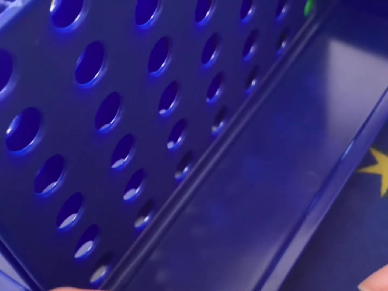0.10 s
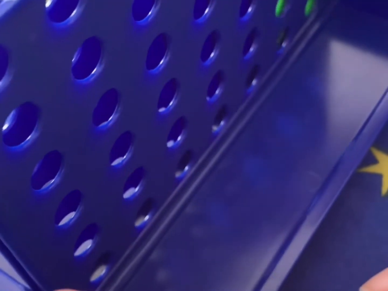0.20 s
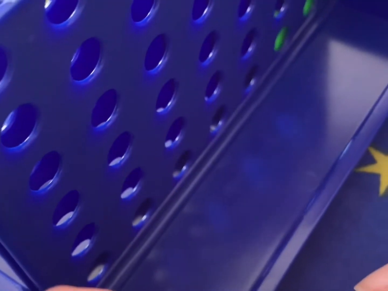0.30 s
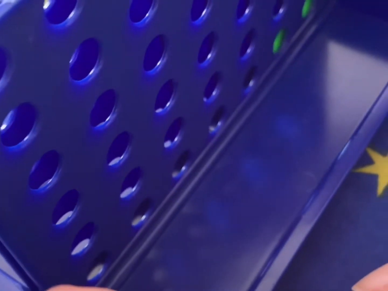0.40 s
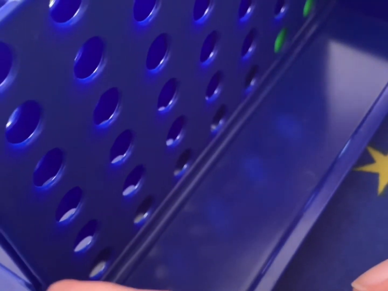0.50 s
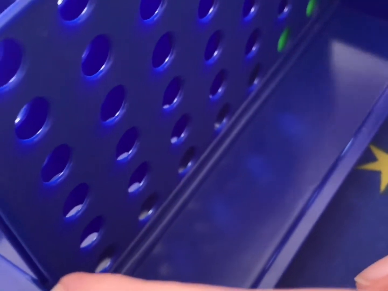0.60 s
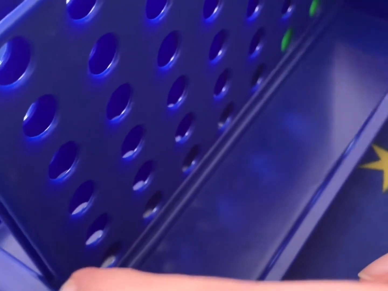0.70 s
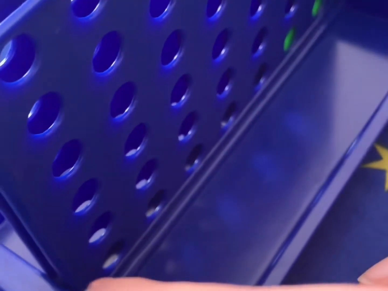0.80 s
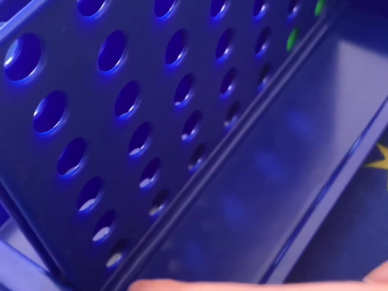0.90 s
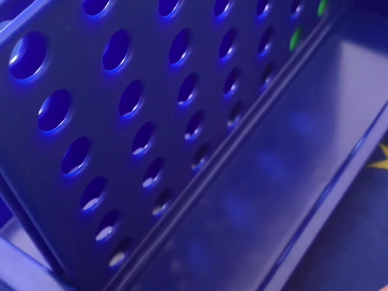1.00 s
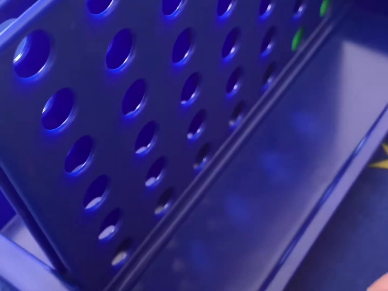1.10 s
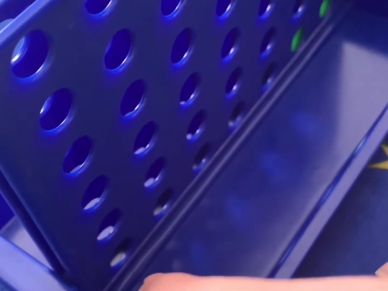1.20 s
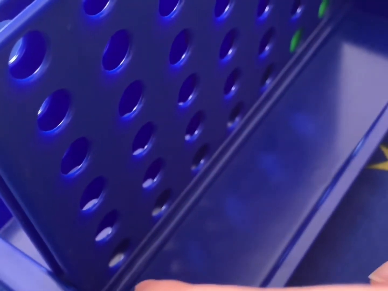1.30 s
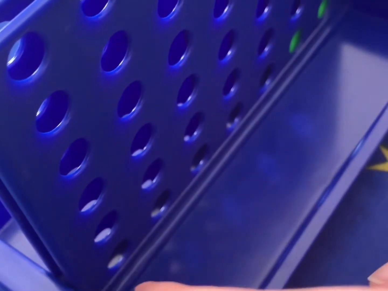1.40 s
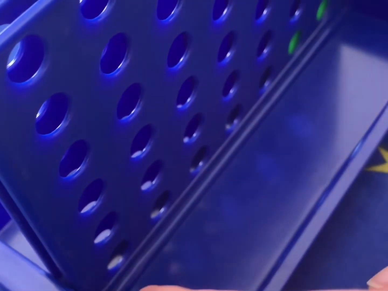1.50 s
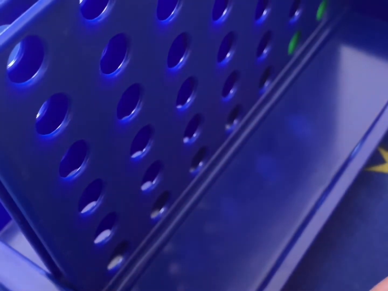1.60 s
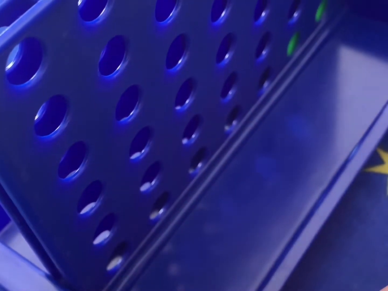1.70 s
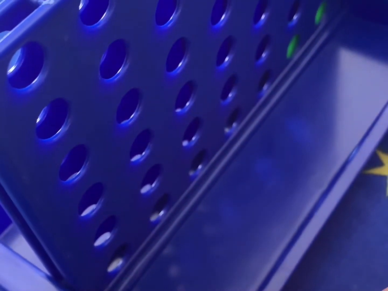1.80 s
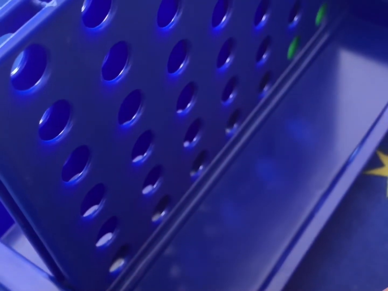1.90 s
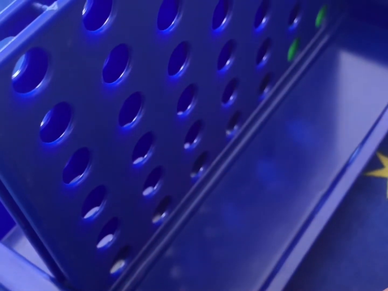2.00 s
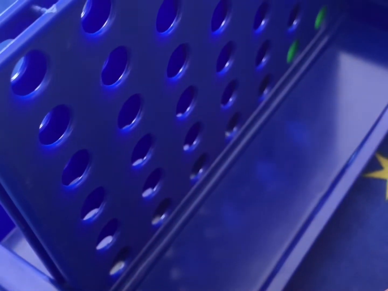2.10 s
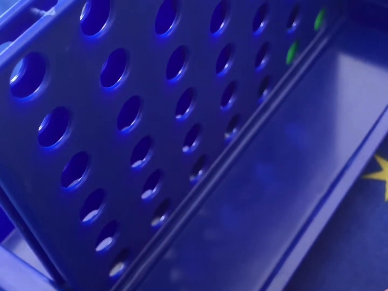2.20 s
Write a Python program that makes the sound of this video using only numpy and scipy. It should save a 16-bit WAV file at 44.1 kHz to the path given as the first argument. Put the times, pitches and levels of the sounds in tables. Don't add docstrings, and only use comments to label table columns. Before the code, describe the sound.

A plastic disc drops into an upright plastic grid: light edge taps from 0.1 s, a sharp knock and scraping rattle at 0.23, a loud landing clack at 0.31 and bounce at 0.34. A small click at 0.52, then handled discs tick and ring high at 0.94-1.1 with soft thumps. Faint ticks near 1.47, a tiny squeak at 1.85, light clicks at 2.1-2.19. Close, dry, quiet room with low rumble.

```python
import sys
import numpy as np
from scipy import signal
from scipy.fft import rfft, irfft, next_fast_len
from scipy.io import wavfile
from scipy.ndimage import map_coordinates

SR = 44100
rng = np.random.default_rng(int(sys.argv[2]) if len(sys.argv) > 2 else 0)


def natural_amplitude(level_db):
    exponent = np.asarray(level_db, float) / 20
    return 10 ** exponent


def wav_record(signal):
    frames = np.transpose(np.atleast_2d(signal))
    bounded = np.clip(frames, -1, 1)
    quanta = np.round(bounded * 32767).astype(np.int16)
    wavfile.write(sys.argv[1], SR, quanta)


N = 97020

# centre_hz, width_hz, level_db
SLOT_MODES = [(1686, 260, -17.5), (2640, 310, -20.5), (3610, 300, -2), (4815, 2000, -13), (6920, 470, 1.5),
              (8650, 740, -3), (11402, 3000, -18), (15000, 1700, -23)]
# centre_hz, width_hz, level_db
LOOSE_GRID_MODES = [(1702, 69, 1), (2030, 350, -6.5), (2457, 110, -1.5), (2934, 110, 2.5), (3424, 90, 5),
                    (3565, 90, 5.5)]
# centre_hz, width_hz, level_db
GRID_TREBLE_MODES = [(4340, 500, -3.5), (6053, 260, 3.5), (7200, 180, -1), (8310, 870, 0.5),
                     (10460, 420, -4), (12230, 1500, -6.5), (14540, 500, -8), (15700, 800, -14)]
SCATTER_DB = 1.5


def unit(x):
    return x / np.sqrt(np.mean(x ** 2) + 1e-20)


def along(points, hz):
    f, v = np.transpose(points)
    return np.interp(np.log(hz + 1), np.log(f + 1), v)


def curve(rows):
    return np.interp(np.arange(N) / SR, *np.transpose(rows))


def wobble(rate):
    knots = rng.standard_normal(int(N * rate / SR) + 4)
    return map_coordinates(knots, [np.arange(N) * rate / SR])


def filtered(x, response):
    m = next_fast_len(x.shape[-1] + 8192)
    return irfft(rfft(x, m) * response(np.fft.rfftfreq(m, 1 / SR)), m)[..., :x.shape[-1]]


def body(modes, hz, extra_db=0):
    centre, width, db = np.transpose(modes)[:, :, None]
    sign = (-1.) ** np.arange(len(modes))[:, None]
    damping = 1j * hz * width
    return (sign * natural_amplitude(db + extra_db) * damping / (centre * centre - hz * hz + damping)).sum(axis=0)


def noise(spectrum):
    return unit(filtered(rng.standard_normal((2, N)), lambda hz: natural_amplitude(along(spectrum, hz))))


def contacts(rows, modes_of, snap, scatter_db, contact=1, rise=0.00036):
    out, t = np.zeros(N + 4096), np.arange(4096) / SR
    for start_s, db, t60, colour in rows:
        force = rng.standard_normal(len(t)) * natural_amplitude(-60 * t / t60) * (1 - np.exp(-t / rise))
        force[8:8 + contact] += snap
        modes = np.array(modes_of(colour))
        scatter = scatter_db * rng.standard_normal((len(modes), 1))
        ring = filtered(force, lambda hz: body(modes, hz, scatter))
        out[round(start_s * SR):][:len(t)] += natural_amplitude(db) * ring / np.abs(ring).max()
    return out[:N]


def tilted(modes):
    return lambda tilt_db: [(c, w, db + tilt_db * np.log2(c / 4000)) for c, w, db in modes]


def lifted(modes, gain_db):
    return [(c, w, db + gain_db) for c, w, db in modes]


def room_tone():
    # frequency_hz, level_db
    room_spectrum = [(60, -4), (95, 3), (140, -18), (190, -7.5), (330, -21), (600, -27), (1100, -23),
                     (2000, -38.5), (4500, -56), (14500, -60.5), (15200, -85)]
    shared, opposed = noise(room_spectrum) * natural_amplitude(0.47 * wobble(7))
    opposed = filtered(opposed, lambda hz: .55 * hz / (hz + 300) / (1 + (hz / 3000) ** 2))
    return natural_amplitude(-57) * (ports(shared) + np.array([opposed, -opposed]))


def handling():
    # start_s, level_db, pitch_hz
    thumps = [
        (.002, -33, 64.4),
        (0.437, -34, 61.4),
        (.58, -35, 25),
        (0.954, -25.5, 85.2),
        (1.1, -31.5, 109.2),
        (2.101, -37, 191),
    ]
    # time_s, level_db
    rumble_level = [(0, -45.5), (.1, -54.5), (.4, -58), (.6, -47.5), (.75, -55.5), (1.1, -48), (1.4, -57),
                    (2.2, -61)]
    # frequency_hz, level_db
    rumble_spectrum = [(8, -11.5), (25, 5.5), (60, -7.5), (120, -14), (300, -14.5), (500, -49), (900, -120)]
    out, t = np.zeros(N + 4096), np.arange(4096) / SR
    for start_s, db, hz in thumps:
        swing = np.sin(2 * np.pi * hz * t) * np.exp(-hz * t / 0.71)
        onset = np.tanh(hz * t * 2) ** 2
        out[round(start_s * SR):][:len(t)] += natural_amplitude(db) * swing * onset
    lumps = unit(natural_amplitude(3 * wobble(42)))
    return out[:N] + noise(rumble_spectrum)[0] * lumps * natural_amplitude(curve(rumble_level) - 3.5)


def rustle():
    # frequency_hz, level_db
    cloth_spectrum = [(1500, -28), (3200, -4), (4500, -3.5), (6000, -0.5), (9000, -7.5), (14200, -4.5),
                      (14800, -36.5)]
    # time_s, level_db
    rustle_level = [(0, -84), (.07, -74.5), (.6, -79), (.7, -69.5), (.8, -75), (.9, -87), (.95, -64.5),
                    (1.02, -59), (1.035, -70), (1.05, -63.5), (1.12, -79), (1.23, -83), (1.29, -75),
                    (1.33, -83), (1.37, -70), (1.5, -87), (2.06, -84.5), (2.15, -67.5)]
    grain = unit(natural_amplitude(2.1 * wobble(250) + 3.0 * wobble(42)))
    return noise(cloth_spectrum)[0] * grain * natural_amplitude(curve(rustle_level) + 1.5)


def column_knocks():
    # start_s, peak_db, chatter_t60_s, brightness_db_per_octave
    knocks = [(.001, -44.5, 0.14, -3.5), (.2341, -4, .009, 0.5), (.236, -9, .008, 2.5),
              (.2475, -19.5, .02, -6.5), (.2491, -17, .016, -2), (.2547, -16.5, .024, -3.5),
              (.2629, -21, .02, 2.5), (.2659, -23, .024, 2.5), (.2732, -21.5, .02, 2),
              (.2796, -28, .024, 1), (.2865, -26.5, .03, 3), (.2938, -29, .04, 2),
              (.4758, -40.5, .03, -0.5), (.478, -38, .04, 1.5), (.4815, -41, .06, -2.5)]
    # centre_hz, width_hz, level_db
    open_column = [(456, 45, 0), (935, 60, -4.5), (1250, 300, -11)]
    modes = tilted(open_column + LOOSE_GRID_MODES + GRID_TREBLE_MODES)
    return contacts(knocks, modes, 5, SCATTER_DB, 2)


def scrape():
    # time_s, level_db
    slide_level = [(.08, -59.5), (.1, -61), (.21, -57), (.2285, -27), (.233, -19.5), (.2365, -40.5),
                   (.252, -31.5), (.3, -44), (.325, -53.5), (.384, -45), (.392, -65), (.45, -113.5)]
    grit = rng.standard_normal(N) * natural_amplitude(2.7 * wobble(500) + 2.0 * wobble(79))

    def plastic(hz):
        grid = body(LOOSE_GRID_MODES + GRID_TREBLE_MODES, hz)
        return (grid + 1.9 * body(SLOT_MODES, hz)) / (1 + 1j * hz / 9000)

    sliding = np.arange(N) / SR > slide_level[0][0]
    return unit(filtered(grit, plastic)) * natural_amplitude(curve(slide_level)) * sliding


def slot_taps():
    # start_s, peak_db, chatter_t60_s, brightness_db_per_octave
    taps = [
        (.099, -34.5, 0.066, -4.5),
        (.1068, -19.5, 0.03, -1),
        (.1188, -25, 0.03, 1),
        (.1592, -22, 0.0093, 2.5),
        (.1832, -24, 0.014, 8.5),
        (.1955, -41.5, 0.015, 3),
        (.2135, -34, 0.025, 2),
        (.2168, -22, 0.017, 2),
        (.2212, -24, 0.016, -1.5),
        (.225, -25.5, .016, -6.5),
    ]
    return contacts(taps, tilted(SLOT_MODES), 1.1, SCATTER_DB, rise=.001)


def landing_clacks():
    # start_s, peak_db, chatter_t60_s, brightness_db_per_octave
    clacks = [
        (.3104, -24, .01, -2),
        (.3123, -1, 0.018, 0.5),
        (.3152, -11, .012, -1),
        (.3238, -21.5, 0.015, -4),
        (.344, -3.5, 0.03, -0.5),
        (.3557, -24.5, 0.014, -1.5),
        (.3598, -13, 0.014, -2),
        (.3692, -25, 0.016, -3.5),
        (.3744, -24.5, .016, -3.5),
        (.379, -32, 0.012, -5),
    ]
    # centre_hz, width_hz, level_db
    filled_column = [(540, 50, -7.5), (800, 410, -19.5), (1092, 65, -10)]
    # centre_hz, width_hz, level_db
    loaded_grid = [(1420, 150, -24), (1760, 85, -2), (1888, 85, 0), (2200, 300, -12), (2448, 90, -5),
                   (2610, 85, 1), (2948, 100, 0), (3420, 90, -2), (3797, 85, 4)]
    modes = tilted(filled_column + loaded_grid + GRID_TREBLE_MODES)
    return contacts(clacks, modes, 7, SCATTER_DB, 3)


def loose_discs():
    # start_s, peak_db, ring_db, body_db, chatter_t60_s
    ticks = [(0.5162, -22.5, 2.5, -4, 0.014), (0.5176, -29.5, 11, -8, .014),
             (0.5224, -35.5, -0.5, -2.5, 0.0157), (0.773, -51.5, -10, -0.5, 0.0095),
             (.858, -45, -9.5, -5, 0.012), (.861, -45, -18.5, -0.5, 0.013), (0.9401, -27, 5, -2, 0.02),
             (0.9431, -20.5, -12, -5, 0.0082), (0.9477, -25.5, -15, 1, 0.0096),
             (.9502, -34, -10, -2, 0.012), (0.9524, -33, -8, 0.5, 0.0087), (.9553, -28, -5, 2, .012),
             (0.9731, -37.5, 2, 7.5, 0.016), (.9821, -25.5, 1.5, -8, 0.0083),
             (0.9877, -25.5, -1.5, 0.5, 0.0075), (0.9922, -34.5, 0, 0, 0.01), (1.0014, -40, -6, 2, 0.012),
             (1.0399, -28.5, -7, 0.5, .011), (1.0405, -26, 11, 1.5, .011), (1.0431, -25, 9.5, 2, .011),
             (1.0457, -25.5, 11, -5.5, 0.01), (1.047, -24, 7.5, -17, .011),
             (1.0497, -24.5, 9.5, -7.5, 0.017), (1.0529, -35, 4, 3, .02), (1.0652, -35, 0.5, -3, .012),
             (1.0686, -37.5, -3, -3, .012), (1.0848, -28, 0.5, -3.5, 0.0085), (1.0854, -30.5, 26, 0, .012),
             (1.0887, -30.5, 10.5, -10, 0.014), (1.168, -53, -4, 10, .011), (1.37, -56.5, -17, 1, 0.012),
             (1.426, -50.5, -22, 4, 0.0082), (1.474, -37.5, -2.5, -7, 0.0093),
             (1.4766, -38.5, -4, -7, 0.012),
             (2.1076, -34.5, -8, -2.5, 0.0072), (2.1095, -44, -3.5, 2, 0.013),
                  (2.1126, -41.5, -6, 0, .012), (2.1153, -37, -6, -5, .009),
                  (2.1244, -31.5, -10.5, -13.5, 0.014), (2.1423, -34.5, -0.5, 6, 0.0111),
                  (2.1475, -38, -7.5, 3, 0.008), (2.1514, -38, -13, 2, .009),
                  (2.1556, -46, -18.5, 8, 0.0077), (2.1648, -28.5, 0, 5.5, 0.0102),
                  (2.1685, -31, 7, -6, .012), (2.1703, -26, 2, -5, .014), (2.178, -37, -20, -5, 0.00824),
                  (2.1839, -33.5, -6, -6, 0.015), (2.187, -49, -4, -9, .014)]
    # centre_hz, width_hz, level_db
    dull_body = (3000, 5600, -16)
    # centre_hz, width_hz, level_db
    broad_modes = [(5505, 1200, -3), (7260, 3200, -5), (9930, 3400, -1.5), (11970, 870, 1.5),
                   (15140, 500, -21)]
    # centre_hz, width_hz, level_db
    high_ring = [(13690, 110, 12), (14350, 160, 1)]

    def disc_modes(mix):
        ring_db, body_db = mix
        return lifted([dull_body], body_db) + broad_modes[:-1] + lifted(high_ring, ring_db) + broad_modes[-1:]

    rows = [(s, db, t60, (ring_db, body_db)) for s, db, ring_db, body_db, t60 in ticks]
    return contacts(rows, disc_modes, 6, 3)


def squeak():
    start_s, pitch_hz, level_db, t60_s = 1.847, 4400, -63, .22
    t = np.clip(np.arange(N) / SR - start_s, 0, 9)
    pitch = pitch_hz * (1 + .018 * wobble(730) - .2 * t)
    phase = 2 * np.pi * np.cumsum(pitch) / SR
    envelope = natural_amplitude(level_db - 60 * t / t60_s) * (1 - np.exp(-t / 0.0051))
    return envelope * (np.sin(phase) + 0.51 * np.sin(2 * phase))


def walls(x):
    # frequency_hz, t60_s
    wall_t60 = [(400, .11), (2500, 0.12), (6500, 0.09), (11000, 0.02), (15000, 0.022)]
    # frequency_hz, share
    wall_side = [(1500, .9), (3500, .15)]
    hz, t, z = signal.stft(rng.standard_normal((2, SR // 2)), SR, nperseg=256)
    share = np.array([np.ones_like(hz), along(wall_side, hz)])[:, :, None]
    decay = natural_amplitude(-60 * t / along(wall_t60, hz)[:, None])
    mid, side = signal.istft(z * share * decay, SR, nperseg=256)[1]
    tail = np.array([mid + side, mid - side]) / np.linalg.norm(mid)
    delayed = np.pad(x, (200, 0))[None]
    return signal.fftconvolve(delayed, tail, axes=1)[:, :N]


def ports(x):
    # frequency_hz, left_right_share
    port_shade = [(100, -.03), (250, -.12), (1500, -.12), (3000, 0)]
    lag_s, corner_hz, soft_hz, top_hz = .000238, 2600, 700, 15690
    left_right = np.array([[1], [-1]])

    def response(hz):
        lead = np.pi * lag_s * np.logaddexp(0, (hz - corner_hz) / soft_hz) * soft_hz
        rolloff = 1 / np.sqrt(1 + (hz / top_hz) ** 40)
        return np.exp(1j * lead * left_right) * rolloff * (1 + along(port_shade, hz) * left_right)

    return filtered(x, response)


def scene():
    discs = column_knocks() + scrape() + slot_taps() + landing_clacks() + loose_discs()
    airborne = discs + natural_amplitude(-13.5) * walls(discs) + rustle() + squeak()
    return ports(airborne) + room_tone() + handling()


def roll_off(x):
    return signal.sosfilt(signal.butter(12, 16980, fs=SR, output="sos"), x)


def record(dry):
    return roll_off(dry)


dry = scene()
out = record(dry)
wav_record(out)
```